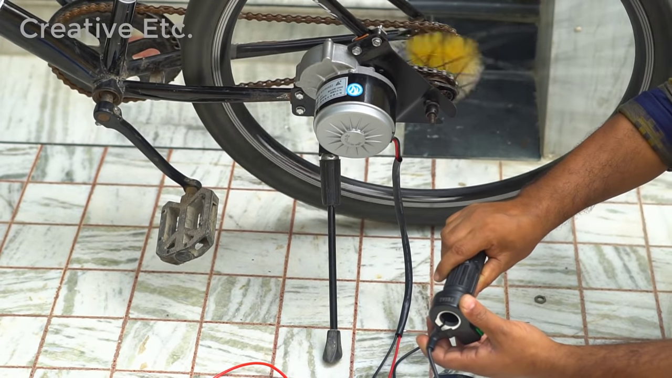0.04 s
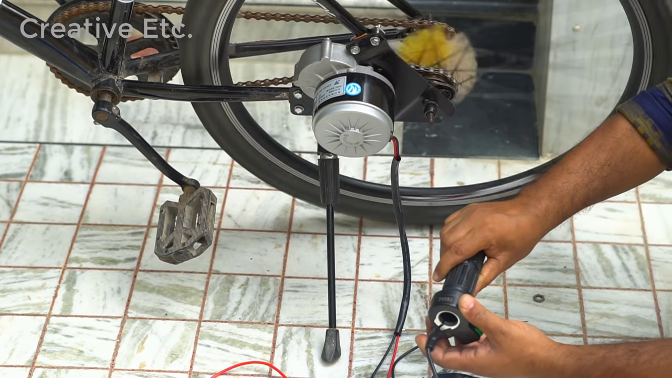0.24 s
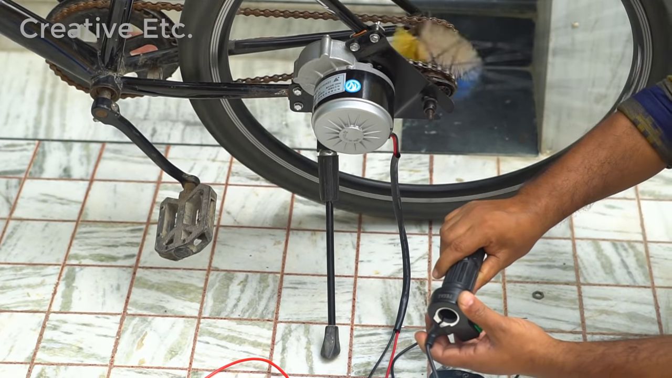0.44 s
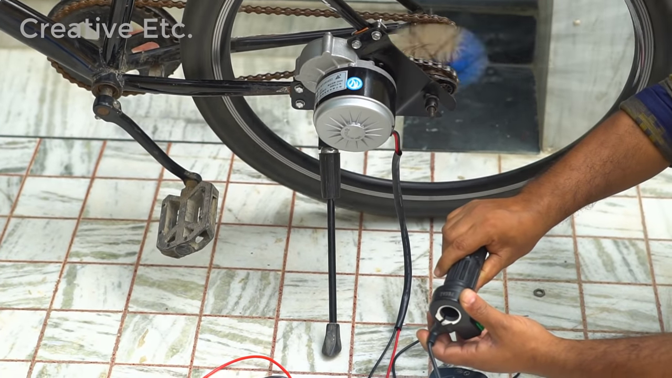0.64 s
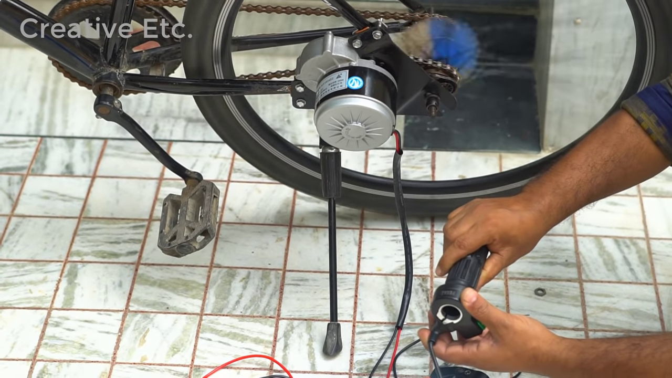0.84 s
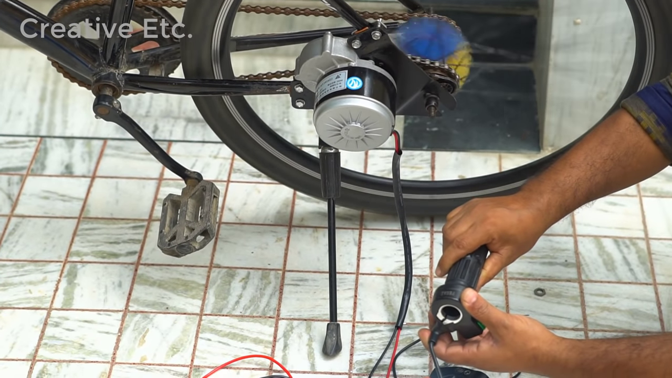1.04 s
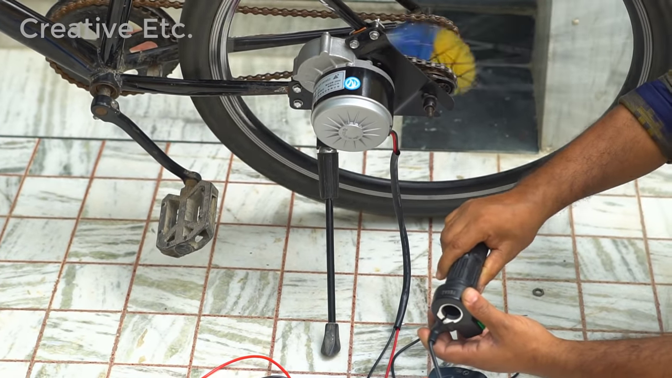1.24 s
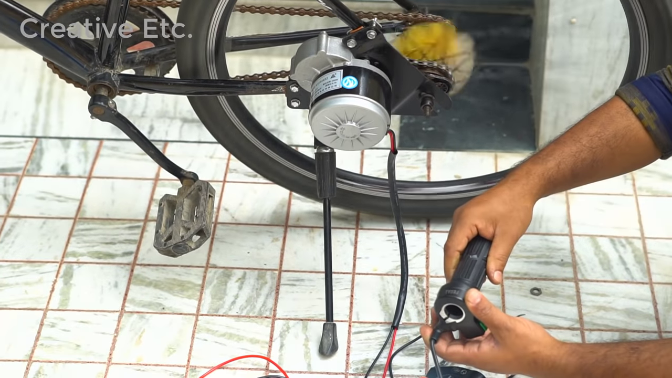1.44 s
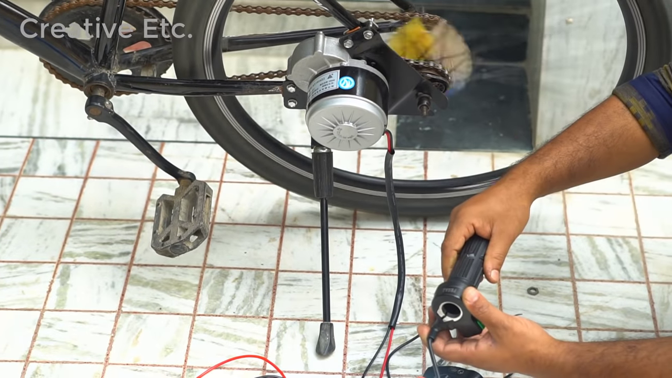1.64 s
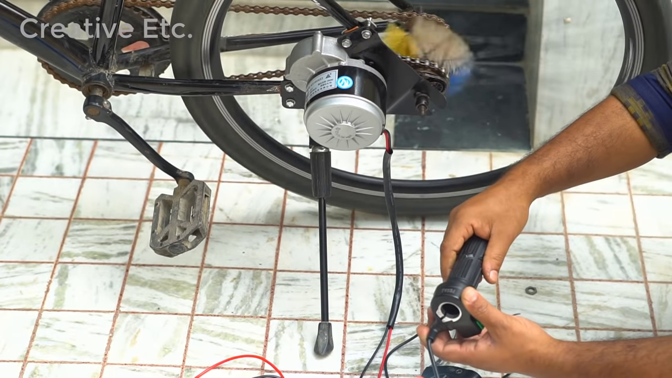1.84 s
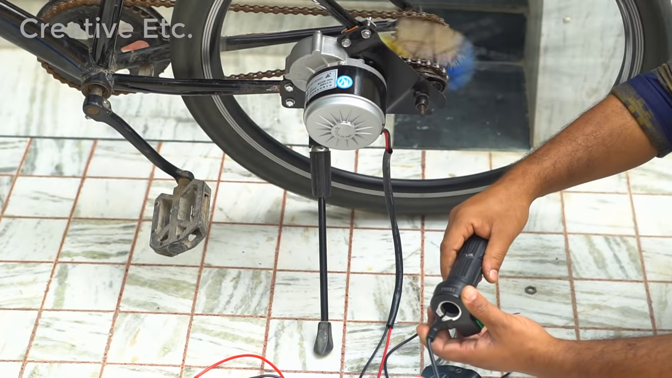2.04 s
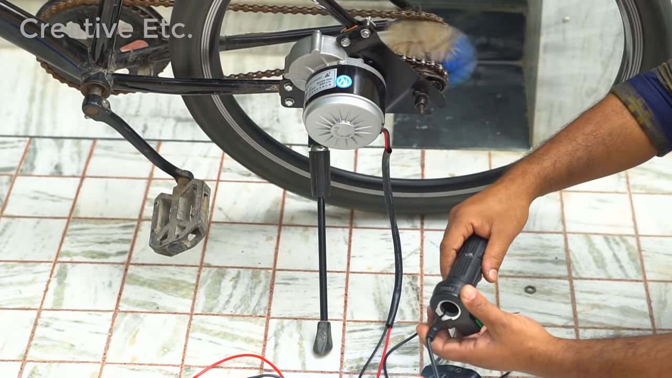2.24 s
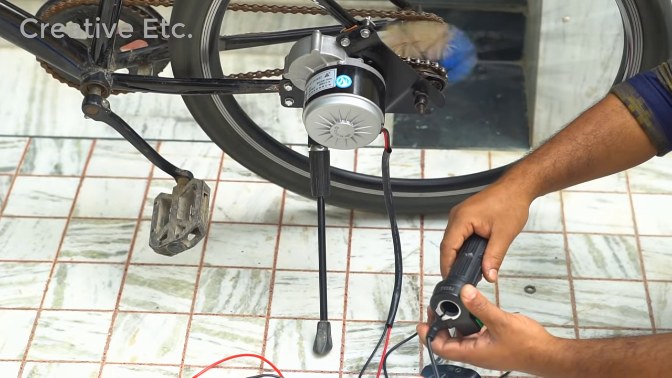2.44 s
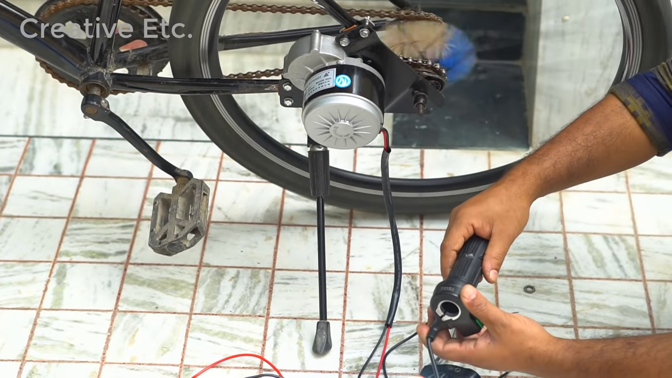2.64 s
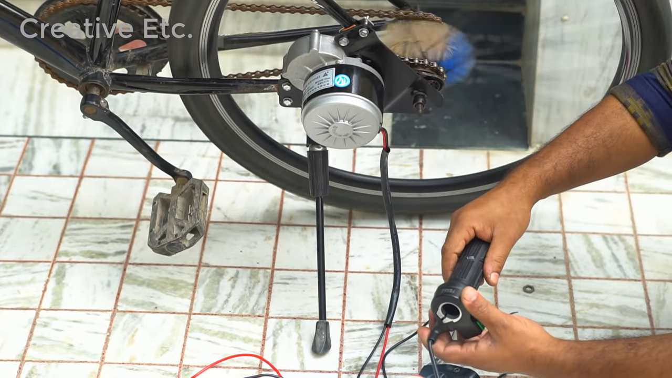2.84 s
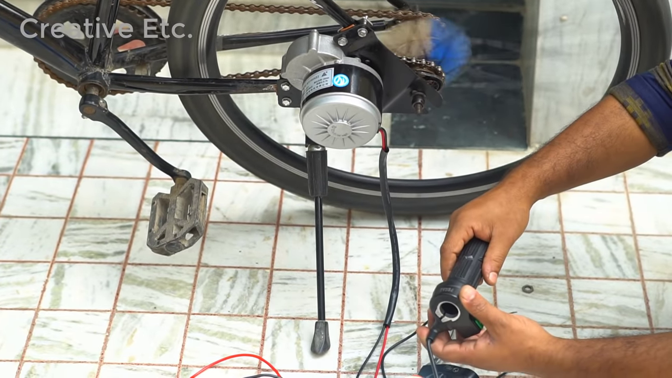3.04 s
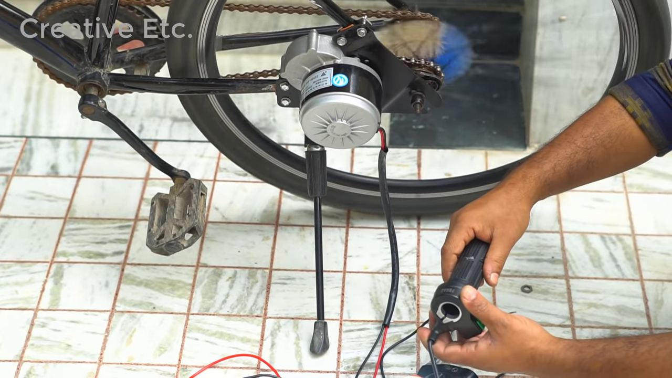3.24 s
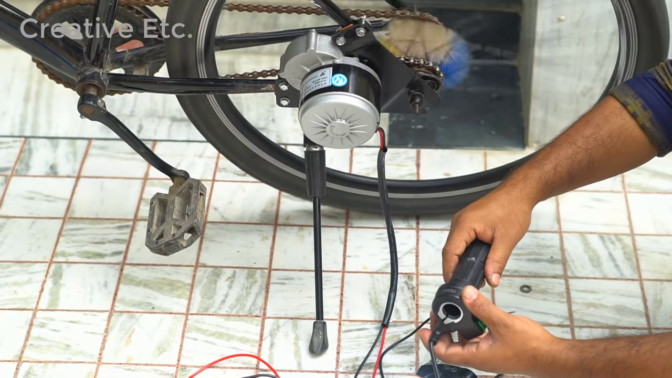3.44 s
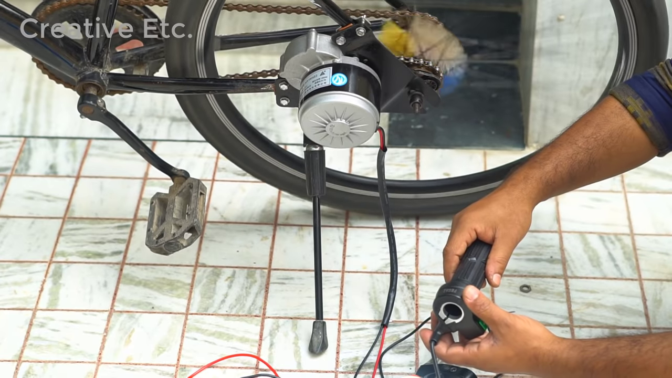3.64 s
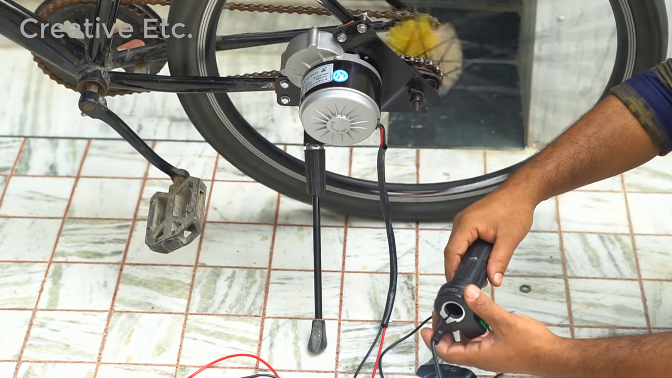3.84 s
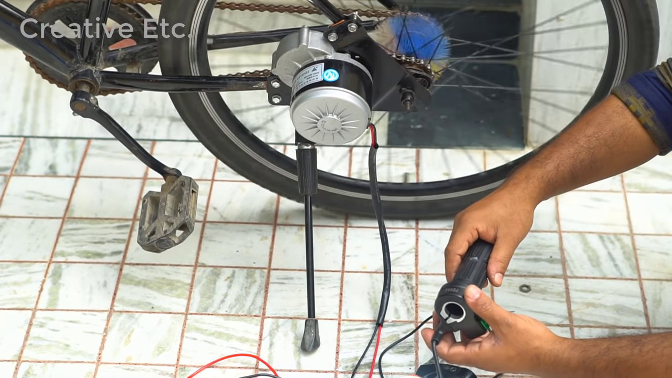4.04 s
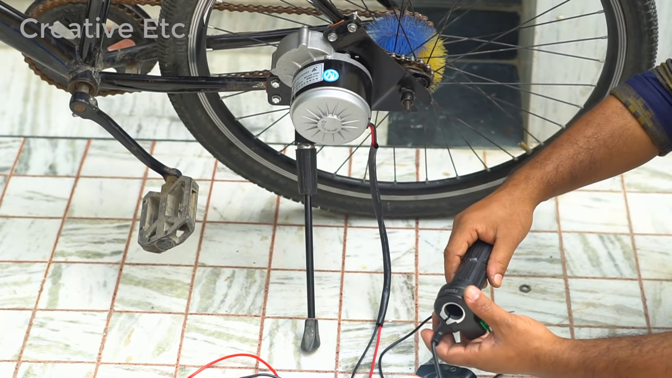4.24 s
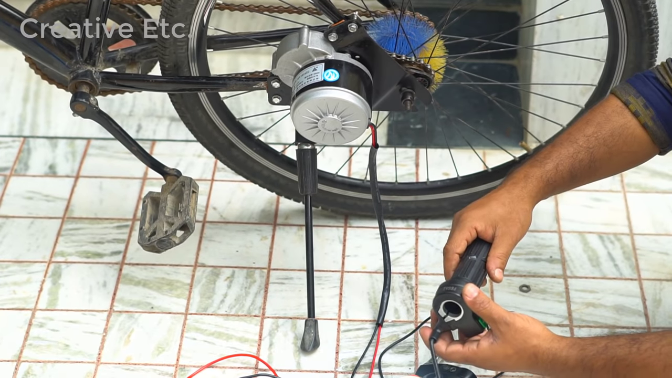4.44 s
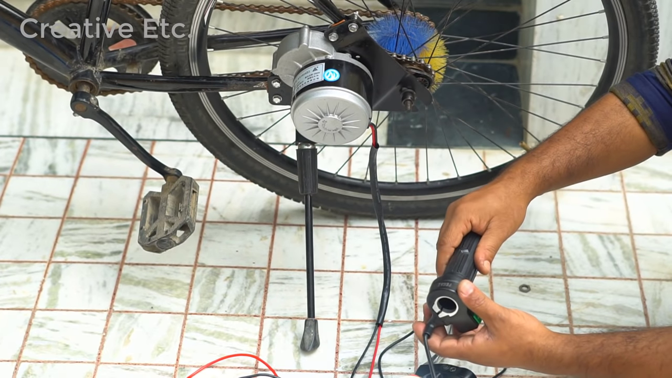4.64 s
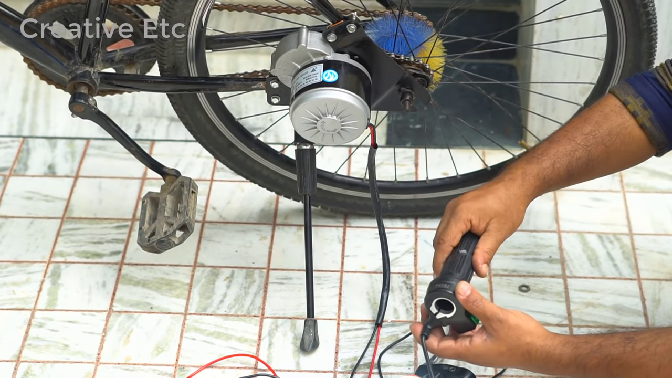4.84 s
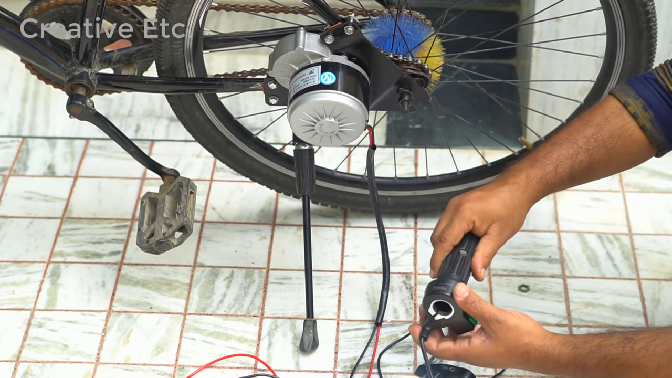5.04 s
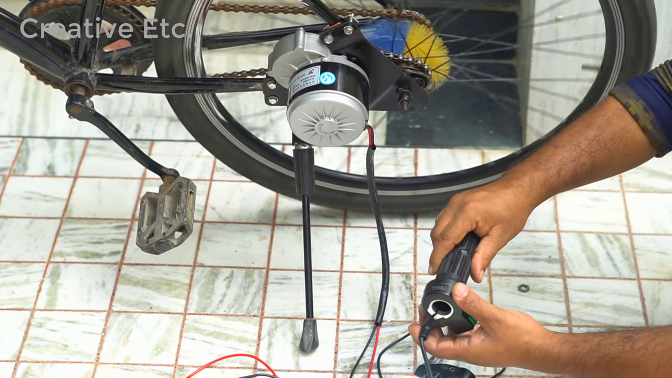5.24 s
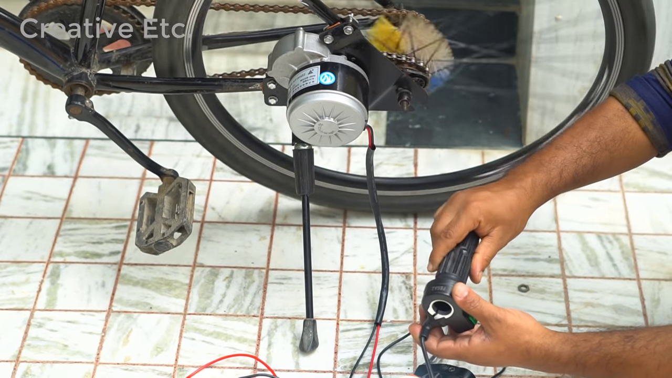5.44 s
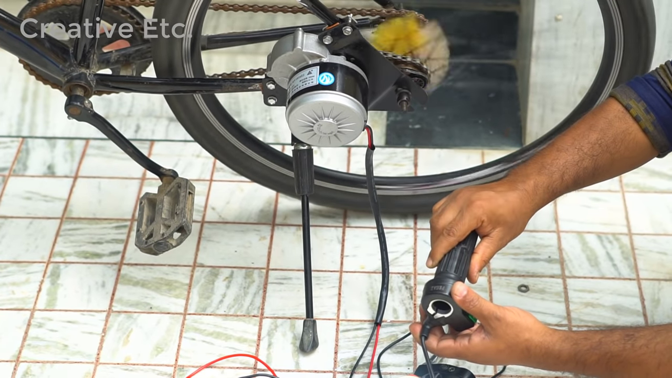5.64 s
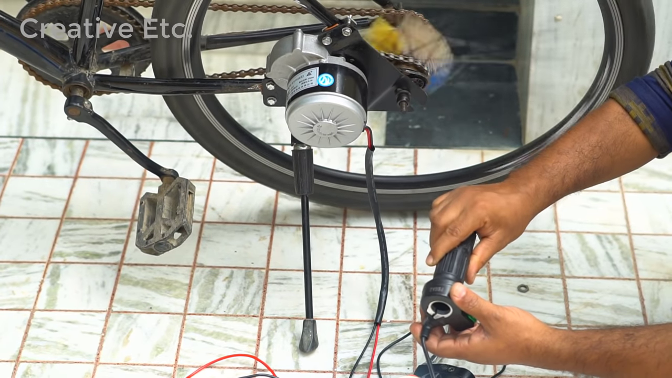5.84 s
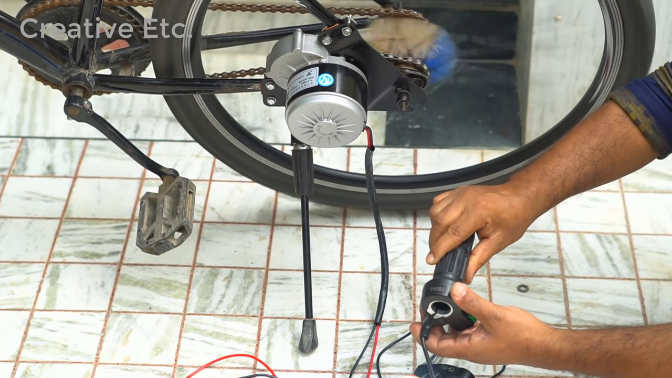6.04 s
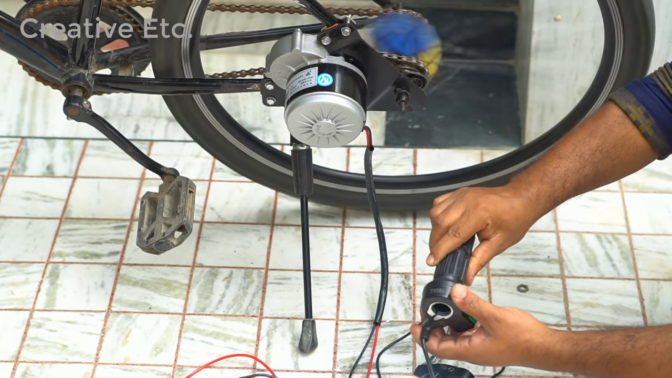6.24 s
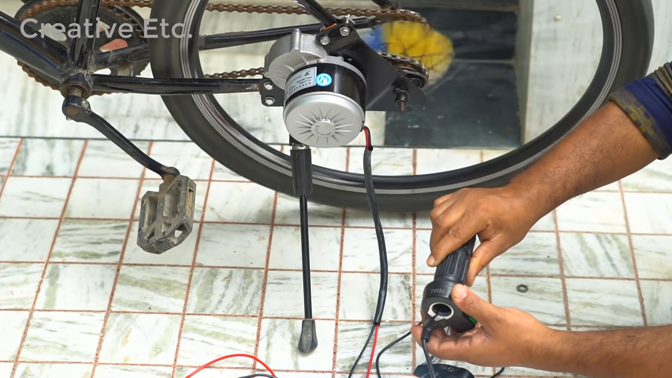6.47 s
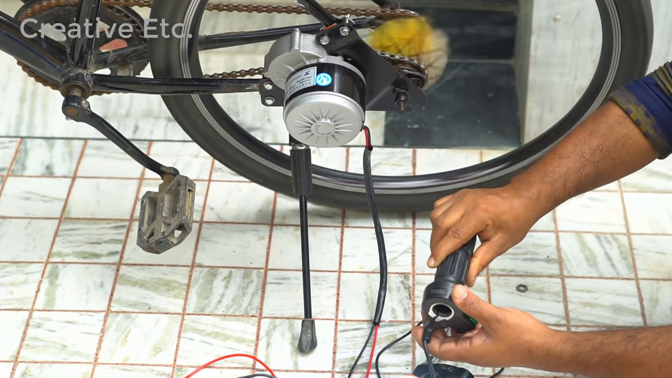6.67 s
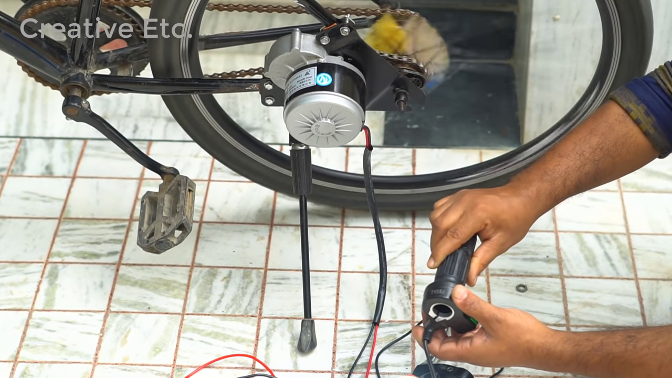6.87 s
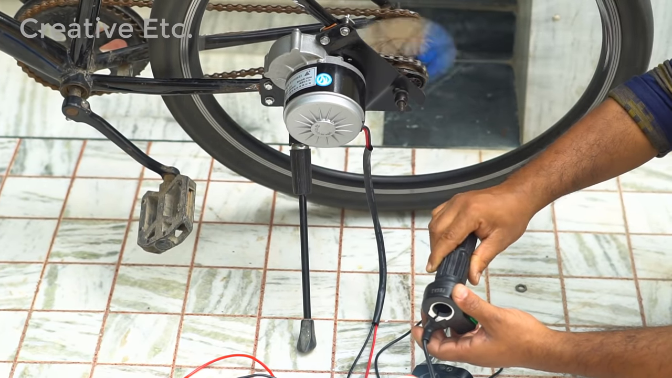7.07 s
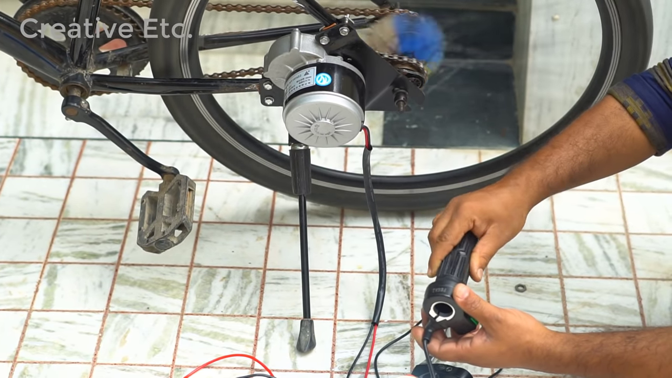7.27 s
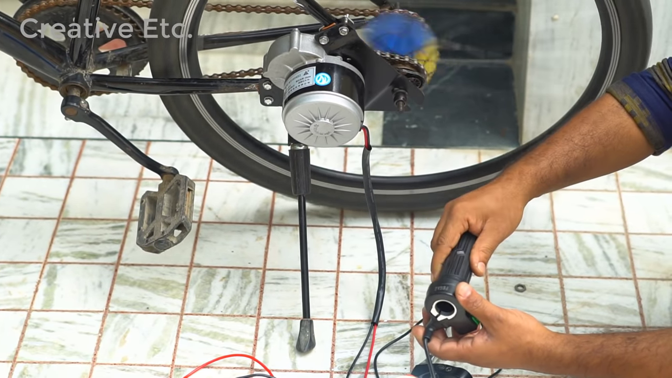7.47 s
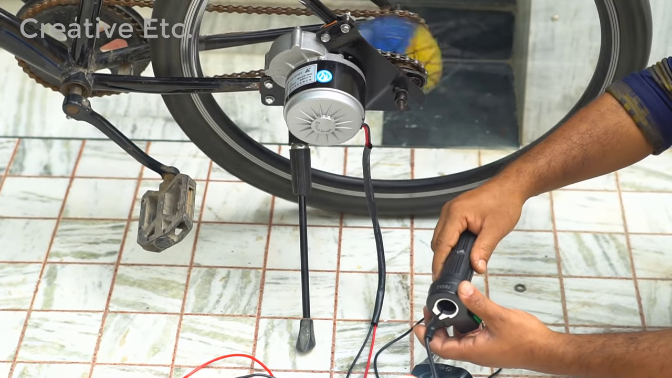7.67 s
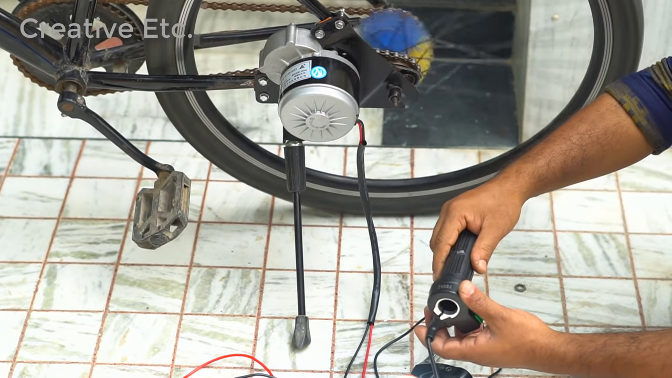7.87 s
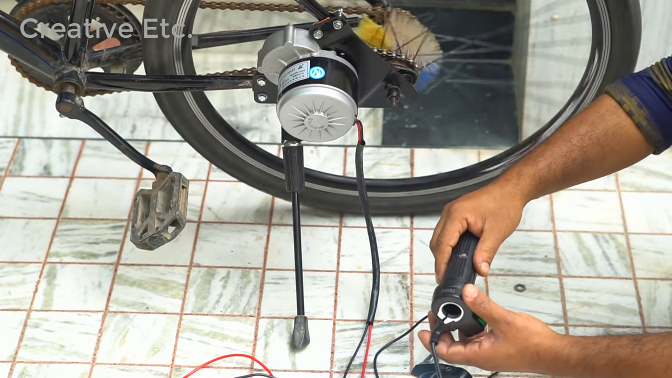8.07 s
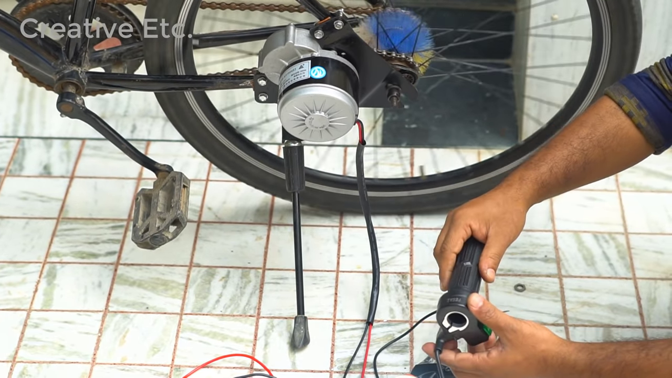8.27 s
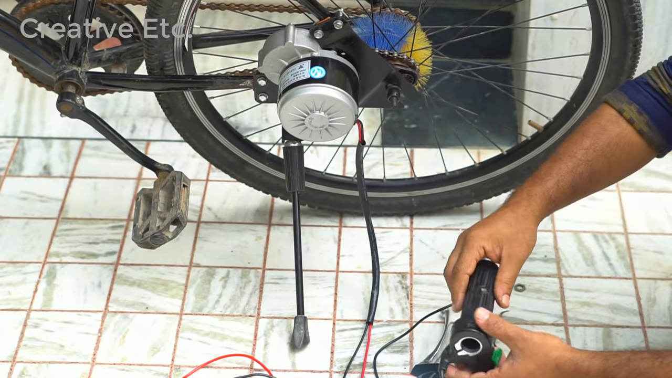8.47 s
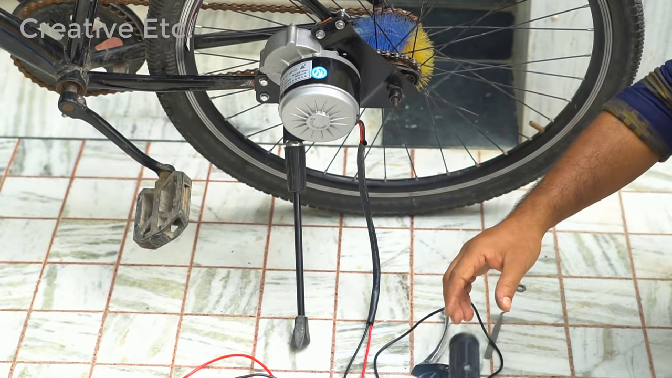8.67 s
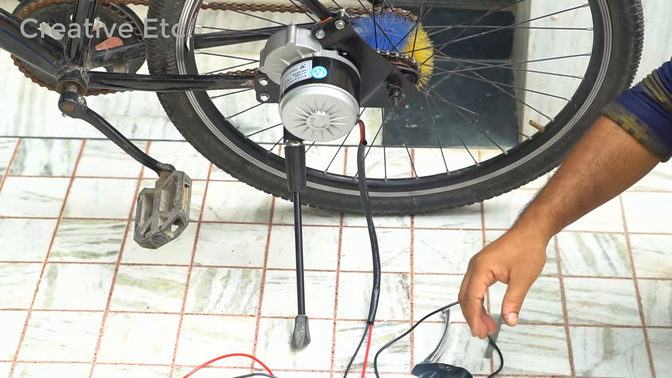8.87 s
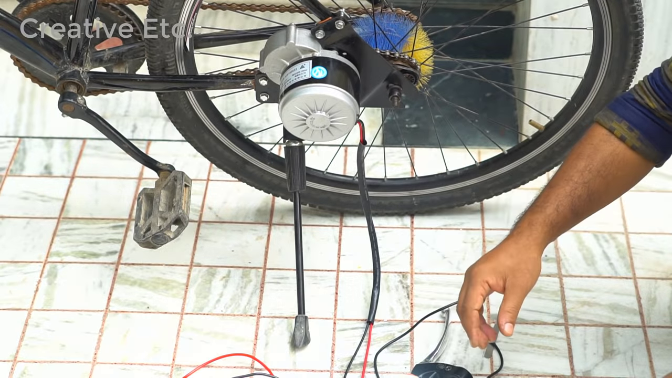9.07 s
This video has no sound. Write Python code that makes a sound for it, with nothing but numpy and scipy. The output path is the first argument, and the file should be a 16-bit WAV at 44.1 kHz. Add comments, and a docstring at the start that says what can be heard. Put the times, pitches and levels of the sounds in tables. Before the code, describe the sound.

Close up in a hard tiled workshop, an electric motor drives a raised bicycle wheel by chain: a steady bright metallic whir with throbbing gear whine. It brakes to ticking links, then a quiet pause with a faint far engine, thin squeals and chirps. The whine climbs quickly back to full speed, runs, then slows to clicks and soft hand rubbing on a grip.

```python
"""A geared electric motor drives the raised rear wheel of a bicycle through a chain, in a tiled workshop.
Twice it runs at full speed with a throbbing gear whine, coasts, and is braked until single links tick.
One speed curve sets the rate of chain impacts and tooth mesh; the load sets how loudly the gears whine.
A far engine putters throughout as firing harmonics and noise puffs. In the pauses come thin gliding tones
(squeals), noise bands (chirps) and a trill; at the end a hand rubs and squeaks on the throttle grip."""
import sys
import numpy as np
from scipy import signal
from scipy.fft import rfft, irfft, next_fast_len
from scipy.io import wavfile
from scipy.ndimage import uniform_filter1d

SR = 44100
rng = np.random.default_rng(int(sys.argv[2]) if len(sys.argv) > 2 else 0)


def dump_mix(stems):
    """Bounce the given channels to the path in sys.argv[1] as a 16-bit WAV at rate SR."""
    frames = np.atleast_2d(stems).T  # one column per channel
    limited = np.clip(frames, -1, 1)  # hard clip at full scale
    pcm = np.round(limited * 32767).astype(np.int16)
    wavfile.write(sys.argv[1], SR, pcm)


N = 401751
TIME = np.arange(N) / SR

# Throttle held wide open. Each row: start in seconds, end in seconds.
FULL_THROTTLE = [(0, 1.33), (5.58, 7.27)]
# Throttle eased, let go and opened again. Each row: time in seconds, share of full throttle.
PART_THROTTLE = [(3.86, 0.84), (4.06, 0.14), (4.3, 0.092), (4.34, 0.021), (5.19, 0.0078), (5.235, 0.27),
                 (7.79, .91), (7.87, 0.41), (8.171, 0.37), (8.43, 0.034)]
# Grip twisted open, gently at first. Each row: time in seconds, share of full throttle.
OPENING = [(5.29, .29), (5.42, .48), (5.475, .62), (5.53, .82)]
# Chain rate at full speed (links per s); lag of the speed behind the throttle (s)
TOP_LINKS_PER_S, SPEED_LAG_S = 119, .075

# Gears biting as the chain pulls tight. Each row: time in seconds, relative level in dB.
BITES = [(.005, -38), (.164, -38.5), (.367, -37), (.56, -37), (.707, -40), (.863, -37), (1.073, -40),
         (1.229, -40.5), (1.351, -47), (5.952, -37.5), (6.154, -41), (6.333, -37.5), (6.517, -40),
         (6.706, -39.5), (6.887, -42.5), (7.034, -41.5), (7.208, -38)]
# Tones within a bite. Each row: multiple of the tooth mesh, relative level in dB.
BITE_HARMONICS = [(2, .5), (3, -1.5), (4, -.5), (5, -15), (6, -4)]
# Surges of load while the wheel picks up speed. Each row: time in seconds, relative level in dB.
SURGES = [(5.275, -56), (5.338, -56), (5.42, -47), (5.475, -42.5), (5.54, -38), (5.578, -34), (5.638, -30),
          (5.712, -37.5), (5.745, -34.5), (5.785, -34), (5.82, -29)]
BITE_S, SURGE_S = 0.018, 0.027   # half lengths
# Gearbox response to the tooth mesh. Each row: frequency in Hz, gain in dB.
GEARBOX = [(300, -60), (850, -26), (1080, -4), (1280, 0.5), (1450, -4), (1570, -1), (1770, 1.5), (1980, 5),
           (2200, 3), (2360, 4), (2580, 1.5), (2720, -4), (2900, -4), (3080, 3), (3300, 2), (3620, 6.5),
           (3900, 0), (4170, 9.5), (4500, -1), (5000, 10), (5300, 6), (5800, 6), (8100, -6), (11000, -26)]
TEETH_PER_LINK = 7.5
# Whine: nominal level when gaining full speed in a quarter second, loss per halving of the speed,
# share of the load left when braking
WHINE_DB, WHINE_DB_PER_HALVING, BRAKING_SHARE = -34, 15.5, 0.45
# Tilt of the whine at low speed, at full speed and when slowing down (dB per harmonic)
SLOW_TILT_DB, FAST_TILT_DB, BRAKING_TILT_DB = -.6, -5.6, -2
# Mesh tone: nominal level at top speed, loss per percent of speed below it, delay of its swell after a bite
HUM_DB, HUM_LOSS_DB, HUM_LAG_S = -60.5, 22, 0.018
LINK_RIPPLE = 0.38   # share by which each link riding onto the sprocket ripples the load
# Resonances of the motor case as a harmonic sweeps past. Each row: time in seconds, frequency in Hz, level in dB.
CASE_RINGS = [(5.275, 1270, -51), (5.338, 3570, -44.5), (5.42, 1270, -53), (5.422, 3590, -42),
              (5.478, 3630, -39), (5.58, 5390, -34), (5.86, 3900, -42)]

# Colours of roller sizzle and frame rattle. Each row: frequency in Hz, relative level per Hz in dB.
SIZZLE = [(1000, -57), (3000, -1.5), (5000, -5.5), (6300, -2), (8300, 1), (10000, -1), (12200, 3),
          (14000, 1.5), (15800, -0.5)]
RATTLE = [(100, -49.5), (250, -64), (380, -28), (520, -14.5), (700, -12.5), (950, -13.5), (1300, -5.5),
          (1700, 1.5), (2700, 4), (3300, -1), (4600, -6.5), (7000, -26), (14000, -36)]
# Ringing of sprockets, spokes and motor case. Each row: frequency in Hz, width in Hz, relative level in dB.
STEEL = [(733, 11, -15.5), (1590, 32, -1.5), (2060, 15, -15), (2228, 6.5, 2.5), (2307, 56, -2.5),
         (2877, 49, -4), (3526, 35, -0.5), (3845, 30, 0), (5434, 44, 2), (5560, 160, 2.5), (6520, 95, -4),
         (7010, 51, -1.5), (8240, 72, -7), (8460, 23, -6), (9100, 57, -15)]
# Sizzle: nominal level far above the knee; below the knee (links per s) its power falls
# with this exponent of the speed
SIZZLE_DB, SIZZLE_KNEE, SIZZLE_POWER = -31, 71.3, 3.26
# Frame rattle and steel: nominal level at full speed, and loss for each halving of the speed
RATTLE_DB, RATTLE_DB_PER_HALVING = -35, 8.5
STEEL_DB, STEEL_DB_PER_HALVING = -40.5, 6
# Slack chain slapping the frame as the wheel coasts. Each row: time in seconds, relative level in dB.
SLAPS = [(7.81, -52), (7.96, -58), (8.07, -54)]
SLAP_S = 0.04   # half length
# Dull knocks of the gearbox taking up its slack, and of the hand on the grip.
# Each row: time in seconds, relative level in dB, decay time in seconds.
KNOCKS = [(4.415, -44, 0.0018), (5.187, -49.5, 0.031), (5.262, -47, 0.042), (8.372, -45, 0.031),
          (8.927, -49, 0.0081)]
# Single links dropping onto the teeth of a slow sprocket. Each row: time in seconds, relative level in dB.
LINKS = [(4.022, -41), (4.061, -38), (4.094, -40), (4.135, -36.5), (4.156, -41), (4.191, -37),
         (4.226, -41.5), (4.257, -61), (4.277, -52), (4.310, -42.5), (4.336, -49), (4.415, -58),
         (4.916, -62), (5.187, -57), (5.231, -45), (5.263, -45), (5.285, -51), (5.301, -43), (5.331, -42),
         (8.017, -40), (8.114, -41), (8.147, -40), (8.173, -39), (8.194, -40), (8.262, -39.5), (8.276, -45),
         (8.293, -47), (8.310, -40), (8.353, -39), (8.375, -39), (8.404, -37.5), (8.428, -37),
         (8.473, -38.5)]
LINK_DECAY_S = 0.0076   # of the hardest drop
# Modes of a dropping roller. Each row: frequency in Hz, mean relative level in dB.
ROLLER_MODES = [(5500, -5), (8200, -7.5), (11800, -11.5), (14000, -6)]
ROLLER_DECAY_S = 0.0038

# Colours of the far engine and the air. Each row: frequency in Hz, relative level per Hz in dB.
FAR_ENGINE = [(45, -65), (200, -38), (480, -21), (620, -7.5), (750, -3), (830, -6), (920, 1), (1020, -8.5),
              (1140, 3), (1330, 0.5), (1520, -10), (3000, -44), (8000, -52)]
AIR = [(25, -43), (65, -17), (100, -14), (135, 0), (200, -10), (350, -9.5), (600, 2), (1200, 0),
       (1800, -11), (3900, 3), (4700, -1.5), (5600, 4.5), (6800, -2), (9000, -11), (15000, -30)]
# Firing rate of the far engine. Each row: time in seconds, firings per second.
ENGINE_RATE = [(5.2, 43.27), (7.8, 44.55)]
# Boom of the far engine. Each row: time in seconds, relative level in dB.
ENGINE_BOOM = [(0, -57.5), (5.2, -79.5), (7.8, -60.5), (9.11, -61.5)]
# Dull, even rush from the first pause through the second run. It holds: start in seconds, end in seconds, level in dB.
RUSH = (4.2, 8, -63)
# Thin far trill. Each row: time in seconds, mean level in dB.
TRILL = [(4.3, -69), (4.42, -65), (4.7, -66), (4.88, -62.5), (4.905, -80)]
# Pips per s, mean pitch, and fall of pitch within each pip
TRILL_PER_S, TRILL_HZ, TRILL_FALL_HZ = 76, 3880, 1300
# Hoarse, high chirps from far off. Each row: time in seconds, frequency in Hz, level in dB.
CHIRPS = [(4.37, 6460, -60), (4.61, 6000, -72), (4.70, 7200, -70), (4.745, 6500, -68), (4.875, 5700, -71),
          (4.99, 5650, -66), (5.075, 5470, -69)]
CHIRP_S, CHIRP_WIDTH_HZ = 0.048, 1200   # half length; width of each resonance
# Thin squeals and chirps from far off.
# Each row: start in seconds, end in seconds, start frequency in Hz, end frequency in Hz, relative level in dB.
SQUEALS = [(4.513, 4.7, 2670, 2670, -61), (4.54, 4.576, 2716, 2664, -58), (4.678, 4.895, 2660, 2750, -63),
           (4.957, 5.07, 2840, 2770, -56.5), (4.96, 5.055, 2270, 2210, -58),
           (4.888, 5.124, 2330, 2390, -64), (4.913, 5.108, 2960, 2880, -64),
           (8.572, 8.605, 6750, 8500, -58), (9.054, 9.104, 1810, 1720, -64)]
# Colour of the hand on the grip. Each row: frequency in Hz, relative level per Hz in dB.
RUSTLE = [(60, -54), (300, -16.5), (1500, -7), (2500, -2.5), (4200, -1), (6000, -5.5), (9000, -9),
          (15000, -13)]
# Steady rubbing: start, fade-in, mean level
HAND_FROM_S, HAND_FADE_S, HAND_DB = 8.42, 0.045, -55.5
# Hoarse squeaks of the sliding hand. Each row: time in seconds, frequency in Hz, level in dB.
SLIDES = [(8.56, 4350, -56), (8.578, 3550, -57), (8.885, 4400, -56)]
SLIDE_S, SLIDE_WIDTH_HZ = 0.044, 500   # half length; width of the resonance

# Reverberant against direct sound. Each row: frequency in Hz, level in dB.
WET = [(100, -21), (300, -53), (650, -4.5), (1300, -6.5), (2700, -8), (5500, -4.5), (14000, -3.5)]
# Diffuse share, which differs between the ears. Each row: frequency in Hz, level in dB.
DIFFUSE = [(200, -62), (650, -19), (1300, -39), (2600, -16.5), (5000, -5.5), (9000, -8), (15000, -14.5)]
CUTOFF_HZ = 15850


def from_db(db):
    """Logarithmic level: decibels to amplitude gain."""
    return 10 ** (np.asarray(db) / 20)


def rms_one(x):
    """Effective value: scale to unit rms."""
    return x / np.sqrt(np.mean(x ** 2) + 1e-20)


def in_time(rows, outside=None):
    """Linear interpolation: a curve read at every sample."""
    rows = np.array(rows)
    return np.interp(TIME, rows[:, 0], rows[:, 1], outside, outside)


def at_hz(points, hz):
    """Logarithmic frequency: a spectrum interpolated on a log-frequency axis."""
    points = np.array(points)
    return np.interp(np.log(np.maximum(hz, 1)), np.log(points[:, 0]), points[:, 1])


def drift(rate):
    """Slow random modulation: interpolated chance of unit rms with `rate` fresh values a second."""
    knots = rng.standard_normal(8192)
    return rms_one(np.interp(TIME * rate, np.arange(len(knots)), knots))


def colour(x, spectrum, size=4096):
    """Minimum-phase filtering: the folded cepstrum gives a causal response; unit rms out."""
    gain = from_db(at_hz(spectrum, np.linspace(0, SR / 2, size // 2 + 1)))
    cepstrum = irfft(np.log(gain))
    cepstrum[1:size // 2] *= 2
    cepstrum[size // 2 + 1:] = 0
    response = irfft(np.exp(rfft(cepstrum)))
    return rms_one(signal.oaconvolve(x, response)[:N])


def resonate(x, hz, width_hz):
    """Damped resonance: a two-pole filter whose pole radius sets the width; unit rms out."""
    r = np.exp(-np.pi * width_hz / SR)
    return rms_one(signal.lfilter([1, 0, -1], [1, -2 * r * np.cos(2 * np.pi * hz / SR), r * r], x))


def each_turn(turns, spread_db):
    """Periodic impact: a click of random strength whenever the count of turns passes a whole number."""
    whole = np.floor(turns).astype(int)
    sizes = from_db(spread_db * rng.standard_normal(4096))
    return (np.diff(whole, prepend=whole[0]) > 0) * sizes[whole % len(sizes)]


def grit(spread_db):
    """Contact noise: countless tiny contacts of uneven size."""
    unevenness = np.minimum(rng.exponential(1, N), 4)
    return rms_one(rng.standard_normal(N) * from_db(spread_db * unevenness))


def swells(rows, half_s):
    """Symmetric pulses: short swells that rise and fall alike, with long skirts."""
    return sum(from_db(db) / (1 + ((TIME - s) / half_s) ** 2) ** 1.14 for s, db in rows)


def humps(rows, half_s):
    """Gaussian pulses: rounded swells with deep gaps between them."""
    envelope = np.zeros(N)
    for s, db in rows:
        near = slice(max(int((s - 4 * half_s) * SR), 0), int((s + 4 * half_s) * SR))
        envelope[near] += from_db(db) * np.exp(-((TIME[near] - s) / half_s) ** 2)
    return envelope


def strikes(rows):
    """Impulsive excitation: blows start at once and die away exponentially."""
    envelope = np.zeros(N)
    for s, db, decay_s in rows:
        age = TIME[:N - round(s * SR)][:SR // 6]
        envelope[round(s * SR):][:len(age)] += from_db(db) * np.exp(-age / decay_s)
    return envelope


def smeared(x, decay_s):
    """Dense reflections: they blur sharp edges and favour some pitches over others."""
    age = TIME[:SR // 10]
    response = rng.standard_normal(len(age)) * np.exp(-age / decay_s)
    return signal.oaconvolve(x, response / np.sqrt(np.sum(response ** 2)))[:N]


def spread_out(direct, diffuse):
    """Interaural decorrelation: a like but unrelated sound enters left and right with opposite signs."""
    size = next_fast_len(N)
    share = from_db(at_hz(DIFFUSE, np.linspace(0, SR / 2, size // 2 + 1)))
    side = irfft(rfft(diffuse, size) * share, size)[:N]
    return direct + side * np.array([[1], [-1]])


def workshop(x, t60, gap_s):
    """Reverberation: direct sound plus a short dense tail off the tiles, different at each ear."""
    age = TIME[:SR // 2]
    tails = rng.standard_normal((2, len(age))) * from_db(-60 * age / t60) * (age > gap_s)
    tails /= np.sqrt(np.sum(tails ** 2, axis=1, keepdims=True))
    wet = from_db(at_hz(WET, np.linspace(0, SR / 2, len(age) + 1)))
    # the 1 in the spectrum is the direct sound
    response = irfft(1 + wet * rfft(tails, 2 * len(age)))[:, :len(age)]
    return signal.oaconvolve(np.atleast_2d(x), response, axes=1)[:, :N]


def chain_speed():
    """First-order lag: the share of full speed trails the throttle."""
    wide_open = [(s, 1) for span in FULL_THROTTLE for s in span]
    partly_open = [tuple(row) for row in [*PART_THROTTLE, *OPENING]]
    throttle = np.clip(in_time(sorted(wide_open + partly_open)), 0, 1)
    keep = np.exp(-1 / (SPEED_LAG_S * SR))
    speed, _ = signal.lfilter([1 - keep], [1, -keep], throttle, zi=[keep * throttle[0]])
    return np.maximum(speed, 1e-4)


def gear_load(speed):
    """Inertial torque: teeth press harder the faster the wheel is sped up, and a little when it is braked."""
    push = np.gradient(speed) * SR / 4
    torque = np.maximum(push, -BRAKING_SHARE * push)
    return from_db(WHINE_DB + WHINE_DB_PER_HALVING * np.log2(speed)) * torque


def gears(speed, bites, count=15):
    """Gear mesh: harmonics grow with load, are smeared by backlash and shaped by gearbox resonances."""
    tight = np.tanh(bites / from_db(-45.5))
    tight = tight - uniform_filter1d(tight, size=8000)
    # the speed swings a little each time the chain tightens and slackens
    mesh_hz = TEETH_PER_LINK * TOP_LINKS_PER_S * speed * (1 + .009 * tight)
    backlash = (.04 * drift(60) + .014 * drift(600)) * (1 - tight)
    mesh = np.cumsum(mesh_hz) / SR + backlash
    ripple = 1 + LINK_RIPPLE * np.sin(2 * np.pi * mesh / TEETH_PER_LINK + drift(40))
    strain = (gear_load(speed) + humps(SURGES, SURGE_S)) * ripple
    # the whine dulls as the speed rises
    driving_tilt_db = SLOW_TILT_DB + (FAST_TILT_DB - SLOW_TILT_DB) * speed ** 3
    tilt_db = np.where(np.gradient(speed) < 0, BRAKING_TILT_DB, driving_tilt_db)
    whine, on = np.zeros(N), strain > from_db(-75)
    for k in range(1, count + 1):
        load = strain[on] * from_db(tilt_db[on] * abs(k - 2) + 2.5 * drift(55)[on])
        partial = np.sin(2 * np.pi * (k * mesh[on] + rng.random()))
        whine[on] += load * from_db(at_hz(GEARBOX, k * mesh_hz[on])) * partial
    # part of the whine reaches the air through the frame and wheel
    whine = .9 * whine + .3 * smeared(whine, decay_s=.007)
    for k, db in BITE_HARMONICS:
        partial = np.sqrt(2) * np.sin(2 * np.pi * (k * mesh + rng.random()))
        whine = whine + bites * ripple * from_db(db + 2 * drift(160)) * partial
    # the mesh tone sings only near top speed
    throb_db = 3.5 * drift(35) + 14 * np.interp(TIME - HUM_LAG_S, TIME, tight)
    hum_db = HUM_DB - HUM_LOSS_DB * 100 * (1 - speed)
    hum_tone = np.sqrt(2) * np.sin(2 * np.pi * (mesh + .3 * drift(30)))
    return whine + from_db(hum_db + throb_db) * hum_tone


def clatter(speed, decay_s, steady, spread_db, return_db):
    """Repeated impact: links hit the motor sprocket, then the wheel sprocket; at speed the hits run together."""
    links = np.cumsum(TOP_LINKS_PER_S * speed) / SR
    hits = each_turn(links, spread_db) + from_db(return_db) * each_turn(links + 0.18, spread_db)
    power = signal.lfilter([1], [1, -np.exp(-2 / (decay_s * SR))], hits ** 2 + 1e-12)
    evened = power / (np.abs(uniform_filter1d(power, size=3000)) + 0.037)
    blur = steady * (0.96 + speed ** 2)
    return np.sqrt((evened + blur) / (1 + blur))


def link_drops():
    """Impact of single links on a slow chain: a harder drop shakes more chain and rings longer."""
    hardest_db = max(db for s, db in LINKS)
    return strikes([(s, db, LINK_DECAY_S * from_db(db - hardest_db) ** .3) for s, db in LINKS])


def chain(speed, bites):
    """Impact noise: bright roller sizzle, duller frame rattle and ringing steel, all growing with speed."""
    sizzle_db = SIZZLE_DB - 10 * np.log10(1 + (SIZZLE_KNEE / (TOP_LINKS_PER_S * speed)) ** SIZZLE_POWER)
    rattle_db = RATTLE_DB + RATTLE_DB_PER_HALVING * np.log2(speed)
    steel_db = STEEL_DB + STEEL_DB_PER_HALVING * np.log2(speed)
    # the slack span swings, and a tight chain rattles harder
    sway = .8 * drift(13)
    drops = link_drops()
    sizzle_gain = from_db(sizzle_db + sway / 2) + from_db(-18) * bites
    rattle_gain = from_db(rattle_db + sway - .7) + from_db(-14) * bites + humps(SLAPS, SLAP_S)
    steel_gain = from_db(steel_db + sway) + from_db(-9) * bites + from_db(-28) * drops
    rollers = sizzle_gain * clatter(speed, decay_s=.0035, steady=.9, spread_db=1.5, return_db=-4) + drops
    frame = rattle_gain * clatter(speed, decay_s=0.023, steady=2.4, spread_db=9.0, return_db=-8.5)
    frame = frame + strikes(KNOCKS)
    paths = []
    for path in range(2):
        shaking = rng.standard_normal(N)
        modes = (from_db(db + 2 * drift(12)) * resonate(shaking, hz, width) for hz, width, db in STEEL)
        steel = rms_one(sum(modes))
        sizzle = from_db(0.78) * rollers * colour(grit(spread_db=3.5), SIZZLE)
        rattle = from_db(-1.18) * frame * colour(grit(spread_db=1.0), RATTLE)
        paths.append(sizzle + rattle + steel_gain * steel)
    return spread_out(*paths)


def far_engine():
    """Periodic combustion: blurred firing harmonics, a noise puff each firing, and a boom that fades and returns."""
    turns = np.cumsum(in_time(ENGINE_RATE)) / SR + .006 * drift(25)
    lines = np.zeros(N)
    for k in range(11, 34):
        strength = from_db(2 * rng.standard_normal())
        lines += strength * np.cos(2 * np.pi * (k * turns + .3 * rng.standard_normal()))
    puff_envelope = signal.lfilter([1], [1, -np.exp(-1 / (.014 * SR))], each_turn(turns, spread_db=2))
    puffs = puff_envelope * rng.standard_normal(N)
    putter = rms_one(lines) + 2.1 * rms_one(puffs)
    boom = resonate(resonate(putter, hz=670, width_hz=190), hz=670, width_hz=190)
    return from_db(-59.5) * colour(putter, FAR_ENGINE) + from_db(in_time(ENGINE_BOOM) - 4.5) * boom


def room_air():
    """Broadband background: steady coloured noise, partly unlike at the two ears."""
    return from_db(-64.0) * spread_out(*(colour(rng.standard_normal(N), AIR) for path in range(2)))


def roller_pings():
    """Modal excitation: every dropping link strikes the roller modes in a mix of its own."""
    out, age = np.zeros(N), TIME[:SR // 20]
    hz, mode_db = np.transpose(ROLLER_MODES)
    for s, db in LINKS:
        strength, detune = rng.standard_normal((2, len(hz)))
        tones = np.sin(2 * np.pi * np.outer(hz * (1 + .015 * detune), age))
        rings = tones * np.exp(-age / ROLLER_DECAY_S)
        out[round(s * SR):][:len(age)] += from_db(db + mode_db + 4 * strength) @ rings
    return out


def rush():
    """Stationary noise: a dull, even rush with softened ends."""
    start, end, db = RUSH
    gate = uniform_filter1d(1. * ((TIME > start) & (TIME < end)), size=4000)
    return from_db(db) * gate * colour(rng.standard_normal(N), RATTLE)


def far_trill():
    """Periodic frequency glide: a fast, even run of short falling pips."""
    along = TIME * TRILL_PER_S % 1
    cycles = np.cumsum(TRILL_HZ + TRILL_FALL_HZ * (.5 - along) + 110 * drift(700)) / SR
    pips = np.sin(np.pi * along) ** 10 * np.sin(2 * np.pi * cycles)
    return from_db(in_time(TRILL, outside=-200) + drift(50)) * rms_one(pips)


def far_chirps():
    """Narrow-band noise: hoarse high calls, blurred by distance into short patches of hiss."""
    noise = rng.standard_normal(N)
    out = np.zeros(N)
    for s, hz, db in CHIRPS:
        band = resonate(resonate(noise, hz, CHIRP_WIDTH_HZ), hz, CHIRP_WIDTH_HZ)
        out += humps([(s, db)], CHIRP_S) * band
    return out


def far_squeals():
    """Frequency modulation: rough, wavering high tones that hold or glide."""
    out = np.zeros(N)
    waver = 1 + .011 * drift(220)
    flutter = from_db(2 * drift(140))
    for start, end, start_hz, end_hz, db in SQUEALS:
        on = (TIME > start) & (TIME < end)
        along = (TIME[on] - start) / (end - start)
        cycles = np.cumsum((start_hz + (end_hz - start_hz) * along) * waver[on]) / SR
        envelope = np.sqrt(2 * np.sin(np.pi * along))
        out[on] += from_db(db) * envelope * flutter[on] * np.sin(2 * np.pi * cycles)
    return out


def case_rings():
    """Resonance of the motor case: short tones of steady pitch cross the rising whine."""
    wander = .06 * drift(150)
    return sum(humps([(s, db)], SURGE_S) * np.sin(2 * np.pi * (hz * TIME + wander))
               for s, hz, db in CASE_RINGS)


def handling():
    """Sliding friction: the hand rubs steadily on the grip and slides along it with hoarse squeaks."""
    rubbing = from_db(HAND_DB + drift(11)) * np.clip((TIME - HAND_FROM_S) / HAND_FADE_S, 0, 1)
    friction = grit(5.0)
    squeaks = sum(humps([(s, db)], SLIDE_S) * resonate(friction, hz, SLIDE_WIDTH_HZ) for s, hz, db in SLIDES)
    return rubbing * colour(grit(3.7), RUSTLE) + squeaks


def scene():
    """Superposition: one speed turns chain and gears; near and far sounds reverberate, a little to the left."""
    speed, bites = chain_speed(), swells(BITES, BITE_S)
    drive = chain(speed, bites) + gears(speed, bites) + case_rings() + roller_pings()
    # small steel parts radiate no bass
    drive = signal.sosfilt(signal.butter(4, 300, "high", fs=SR, output="sos"), drive)
    background = far_engine() + far_squeals() + far_trill() + far_chirps() + rush()
    leftward = np.array([[1], [-1]])
    near = workshop(drive, t60=0.076, gap_s=0.0025) * from_db(0.37 * leftward)
    # the hand shares the reverberation and balance of the far sounds
    far = workshop(background + handling(), t60=0.1, gap_s=0.00043) * from_db(2.2 * leftward)
    return near + far + room_air()


def record(dry):
    """Low-pass filtering: an elliptic filter cuts the top steeply."""
    return signal.sosfilt(signal.ellip(12, .2, 80, CUTOFF_HZ, fs=SR, output="sos"), dry)


dry = scene()
out = record(dry)
dump_mix(out)
```